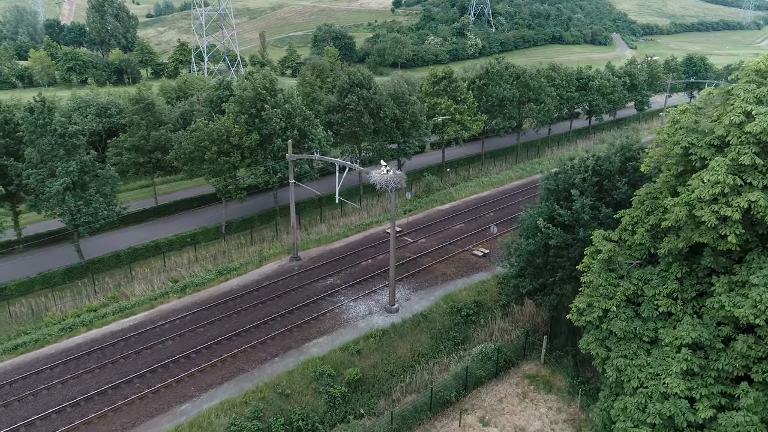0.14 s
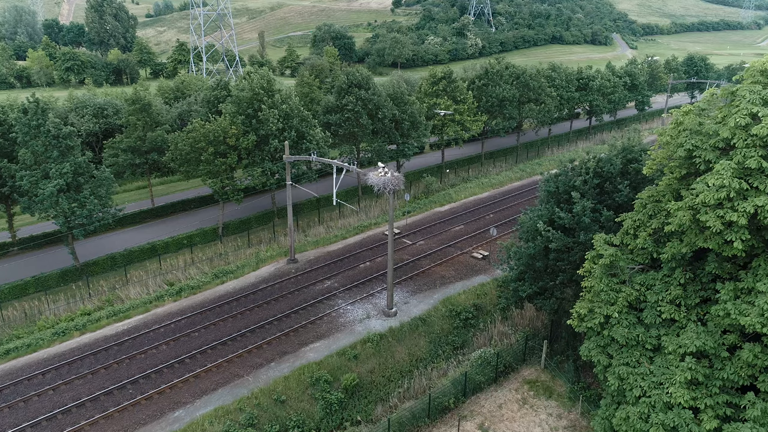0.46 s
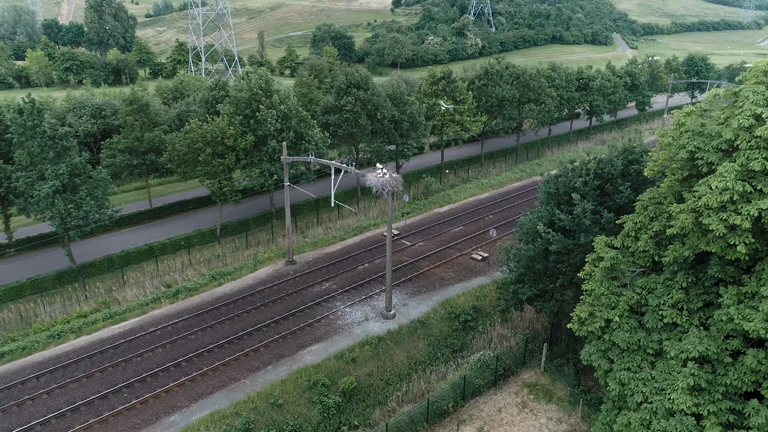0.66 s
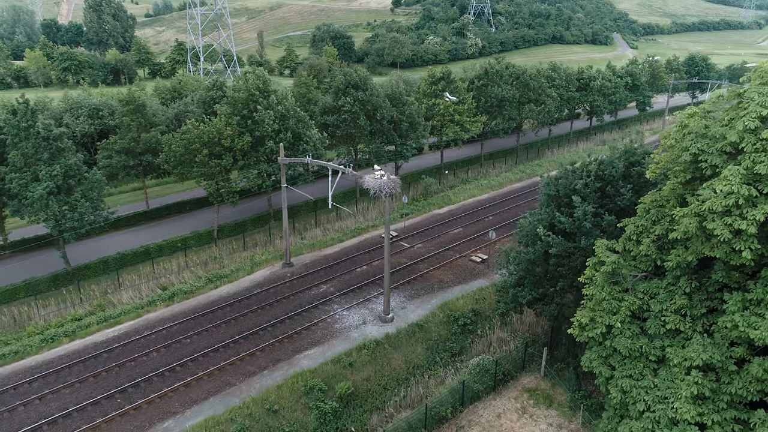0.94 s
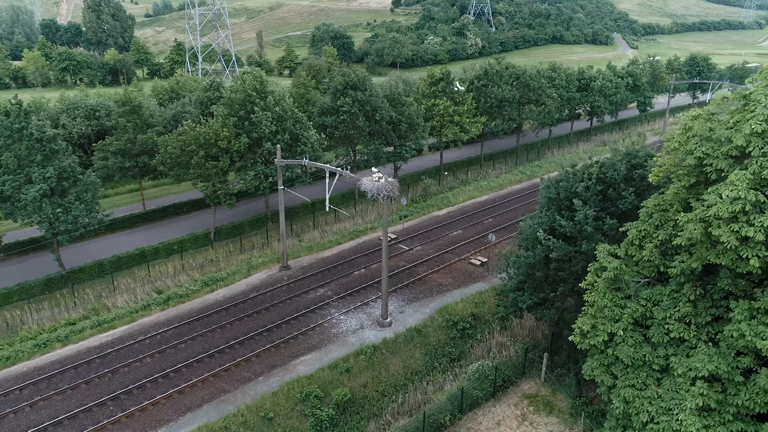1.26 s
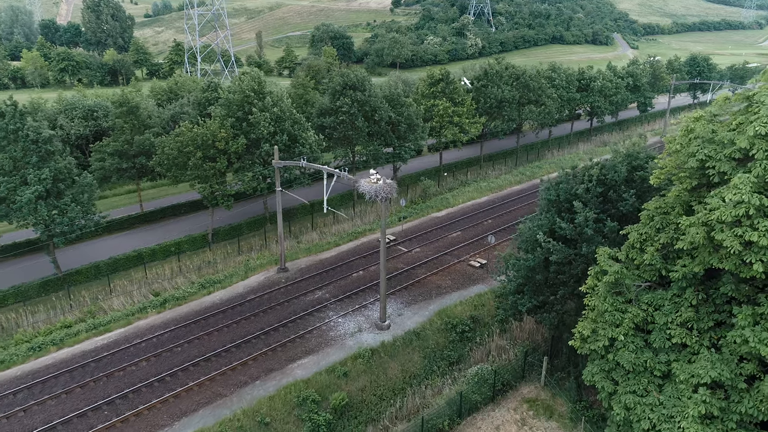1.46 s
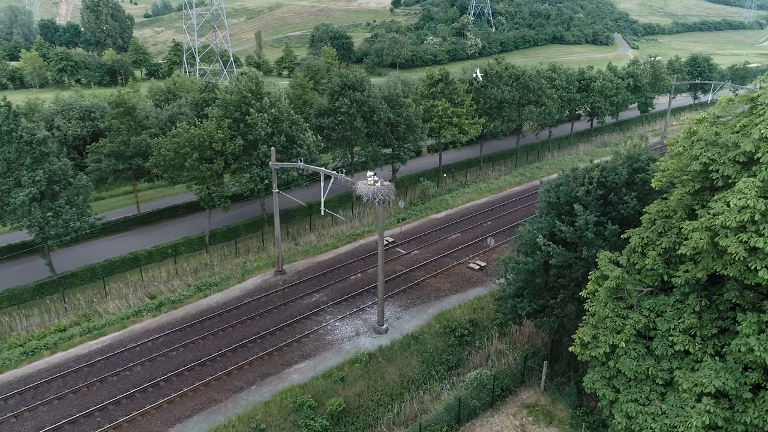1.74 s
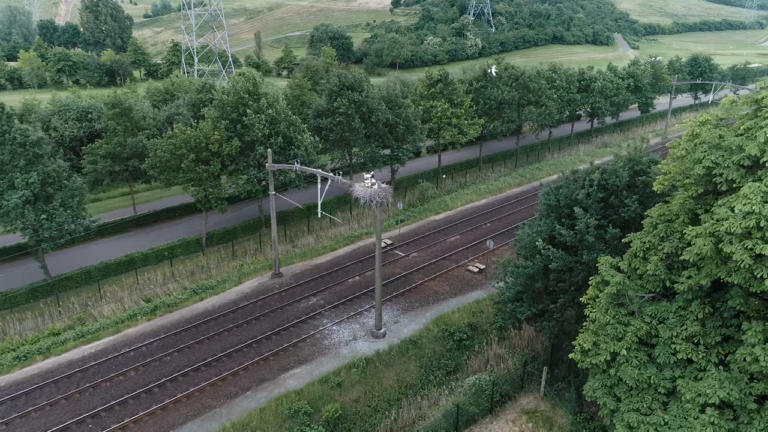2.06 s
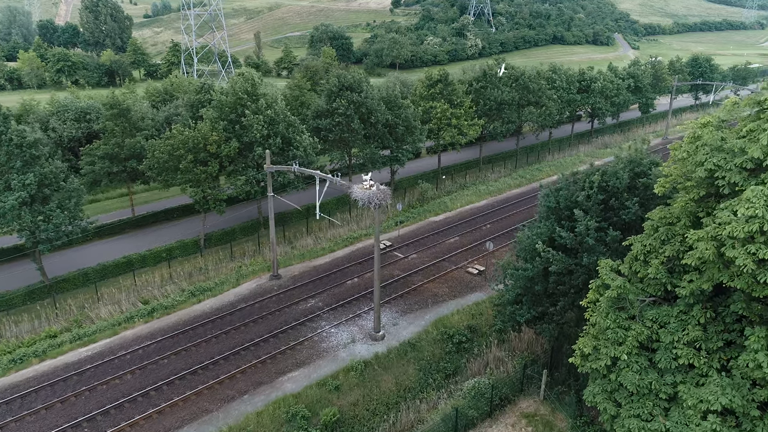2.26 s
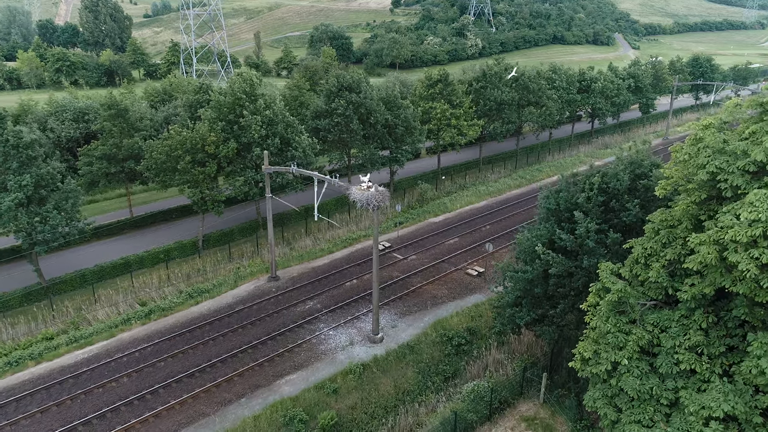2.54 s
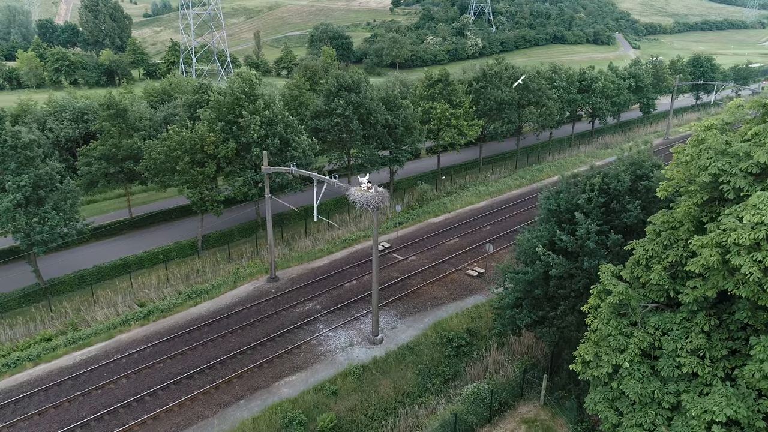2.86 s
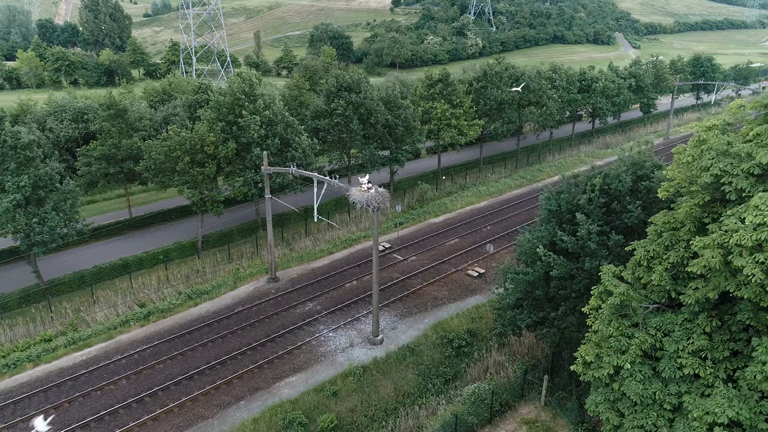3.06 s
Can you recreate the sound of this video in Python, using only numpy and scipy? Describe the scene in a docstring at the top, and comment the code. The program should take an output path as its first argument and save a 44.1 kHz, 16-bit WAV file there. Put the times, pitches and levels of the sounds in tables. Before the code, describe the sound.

Fast, hollow bill clattering from a stork slows and softens, with wind rumbling underneath.

```python
"""Beside a railway, near a stork's nest on a gantry, with trees farther off.
The bird clatters its bill, ten claps a second, slowing as it lowers its head. Each clap rings the hollow
bill and throat, whose resonances shift with the posture; nest, track bed and trees scatter it.
Low wind rumble runs underneath, with faint hiss, a thin electrical whine and one tiny, distant chirp."""
import sys
import numpy as np
from scipy import signal
from scipy.fft import rfft, irfft
from scipy.io import wavfile
from scipy.ndimage import uniform_filter1d

SR = 44100
rng = np.random.default_rng(int(sys.argv[2]) if len(sys.argv) > 2 else 0)


def store_wav(level_fs):
    """Save 16-bit WAV to argv[1]."""
    pcm = np.round(np.clip(np.atleast_2d(level_fs), -1, 1) * 32767)
    wavfile.write(sys.argv[1], SR, pcm.T.astype(np.int16))


N = 141120


def undb(db):
    """Decibels to amplitude."""
    return 10 ** (np.asarray(db) / 20)


def unit(x):
    """Scale to an rms of 1."""
    return x / np.sqrt(np.mean(x ** 2))


def curve(t, rows):
    """Straight lines through (s, value) rows."""
    return np.interp(t, *np.array(rows).T[:2])


def noise(points, size):
    """Noise of rms 1 with a spectrum shaped by (Hz, dB) points."""
    hz, db = np.array(points).T
    bins_hz = np.maximum(np.fft.rfftfreq(size, 1 / SR), 1)
    shape = undb(np.interp(np.log(bins_hz), np.log(hz), db))
    return unit(irfft(rfft(rng.standard_normal(size)) * shape, size))


def walk(rate):
    """Smooth random wander of rms 1, taking `rate` steps a second."""
    hold = max(int(SR / rate), 1)
    steps = np.repeat(rng.standard_normal(N // hold + 1), hold)
    return unit(uniform_filter1d(steps, hold)[:N])


def fade(t, t60):
    """Exponential decay that loses 60 dB in t60 seconds."""
    return np.exp(-np.log(1000) * t / t60)


def add(out, x, at):
    """Mix x into out from a time in seconds."""
    start = max(int(at * SR), 0)
    out[start:start + len(x)] += x[:max(len(out) - start, 0)]


def wind(t):
    """Wind at the microphone: a deep gust dies away; a rumble with one lull and a softer rush go on."""
    # Rumble and the rush above it. Each row: frequency in Hz, relative spectral level in dB.
    rumble_colour = [(15, -14.5), (28, 3.5), (60, 1.5), (110, 0), (175, 1.5), (220, -9.5), (300, -13),
                     (420, -20.5), (700, -24), (2000, -87)]
    rush_colour = [(120, -23), (200, -1), (290, -0.5), (420, -8), (560, -13), (720, -14), (900, -18.5),
                   (1200, -31), (2000, -63.5), (4000, -72)]
    # Their strength, the rumble's in two stretches. Each row: time in seconds, level in dB.
    rumble_levels = [
        [(0.0, -28), (0.246, -42.5), (0.286, -36), (0.706, -34), (1.17, -39.5)],
        [(1.28, -35), (2.29, -39.5), (2.306, -35), (3.14, -40.5), (3.2, -36.5)],
    ]
    rush_levels = [(0.0, -37), (0.23, -53), (0.44, -42), (0.97, -42.5), (1.25, -56), (1.29, -45),
                   (1.54, -48.5), (1.91, -42.5), (1.92, -39), (2.07, -43.5), (3.2, -46)]
    gust_db, gust_fade_s = -26, 0.068
    lull_at_s, lull_width_s, lull_depth_db = 1.222, 0.027, -10
    gust = noise([(28, -3), (56, 0), (112, -15), (560, -80)], N)
    gust *= undb(gust_db) * np.exp(-(t / gust_fade_s) ** 2)
    lull_db = lull_depth_db * np.exp(-((t - lull_at_s) / lull_width_s) ** 4)
    rumble = noise(rumble_colour, N) * undb(curve(t, np.concatenate(rumble_levels)) + lull_db)
    rush = noise(rush_colour, N) * undb(curve(t, rush_levels))
    buffeting = undb(0.8 * walk(rate=18))
    return gust + (rumble + rush) * buffeting


def hiss():
    """The faint, steady hiss of the open air."""
    # Each row: frequency in Hz, relative spectral level in dB.
    colour = [(500, 9.5), (1200, 13.5), (1650, 19), (2100, 11), (3000, 9.5), (4200, 2), (5200, 0.5),
              (6500, -3.5), (9200, -3), (10600, -10.5), (11800, -5.5), (13000, -13), (15000, -13)]
    return undb(-63) * noise(colour, N)


def whine(t):
    """Two thin electrical tones, one pulsing and one wavering in level."""
    pulsed_hz, pulses_per_s, wavering_hz = 11288, 25, 14050
    gate = np.maximum(np.cos(2 * np.pi * pulses_per_s * (t - 0.018)), 0)
    pulsed = undb(-75.5) * gate * np.sin(2 * np.pi * pulsed_hz * t)
    wavering = undb(-90.5) * (1 + 1.6 * walk(rate=140)) * np.sin(2 * np.pi * wavering_hz * t)
    return pulsed + wavering


def clap(posture, bright_db):
    """The mandibles meet: their edges crack, and bill and throat give a short, hollow knock."""
    # Resonances of bill and throat. Each row: frequency in Hz with the head thrown back, then lowered,
    # level in dB, build-up in seconds, t60 in seconds thrown back, then lowered.
    modes = [(782, 748, -1.5, 0.001713, 0.0099, 0.033), (889, 740, -1.5, 0.00198, 0.016, 0.014),
             (1580, 1870, -13.5, 0.00053, 0.0045, 0.012), (1618, 2140, -4, 0.00142, 0.015, 0.013),
             (2300, 2510, -18, 0.001532, 0.017, 0.019), (2510, 4200, -17.5, 0.001594, 0.018, 0.0062),
             (2788, 3180, -10.5, 0.001505, 0.014, 0.0072), (3507, 4200, -24, 0.000987, 0.011, 0.0065),
             (4350, 4800, -32.5, 0.00076, 0.013, 0.0057), (5100, 5200, -31, 0.00077, 0.012, 0.0027)]
    pitch_spread, level_spread_db = 0.012, 1.04
    crack_top_hz, crack_decay_s = 8600, 0.0015
    t = np.arange(SR // 20) / SR
    knock = np.zeros(len(t))
    for k, (back_hz, low_hz, db, build_s, back_t60, low_t60) in enumerate(modes):
        detune, vary = rng.standard_normal(2)
        hz = (back_hz + posture * (low_hz - back_hz)) * (1 + pitch_spread * detune)
        t60 = back_t60 * (low_t60 / back_t60) ** posture
        gain = undb(db + level_spread_db * vary + (bright_db if k >= 2 else 0))
        envelope = (1 - np.exp(-(t / build_s) ** 2)) * fade(t, t60)
        knock += gain * envelope * np.sin(2 * np.pi * hz * (t - build_s))
    lowpass = signal.butter(2, crack_top_hz, fs=SR, output="sos")
    crack = signal.sosfilt(lowpass, rng.standard_normal(len(t))) * np.exp(-t / crack_decay_s)
    crack_db = -25.5 + bright_db - 10 * posture  # softer with the head lowered
    return knock + undb(crack_db) * crack


def scatter(x, colour, t60, onset_s, size):
    """Diffuse reflections: x through a tail of unit energy that swells and decays."""
    t = np.arange(size) / SR
    swell = 1 - np.exp(-(t / onset_s) ** 2)
    tail = noise(colour, size) * fade(t, t60) * swell
    return signal.fftconvolve(x, tail / np.sqrt(np.sum(tail ** 2)))


def stork():
    """Each clap reaches the microphone directly, as near echoes, and off nest, track bed and trees."""
    # Bill claps. Each row: start in seconds, relative level in dB,
    # brightness in dB (added to the crack and all but the two lowest resonances).
    claps = [(0.019, 2.5, -3), (0.1137, 3, -4.5), (.2110, 2, -3), (0.3067, 3, -3.5), (0.4028, 3.5, -3.5),
             (0.5023, 2, -0.5), (0.5988, 2, -0.5), (.6961, 2, -1.5), (0.7943, 1, 0), (0.8925, 1.5, -1.5),
             (0.991, 4, -3.5), (1.0895, 3.5, -3), (1.1915, 3, -2), (1.2909, 2.5, -2.5), (1.3908, -0.5, 0),
             (1.4945, 2.5, -2.5), (1.603, 2, -3), (1.713, 1.5, -2.5), (1.8249, 0.5, -2), (1.9418, -2.5, -1),
             (2.0598, -2.5, -12), (2.1918, -6, 0), (2.3255, -3, -1.5), (2.4591, -4.5, -5.5),
             (2.5949, -5.5, -6), (2.7296, -4.5, -8), (2.8641, -6, -6.5), (3.0012, -5.5, -8.5),
             (3.1433, -5, -7)]
    # The neck. Each row: time in seconds, posture (0 thrown back, 1 lowered, above 1 lower still).
    postures = [(0, 0), (.4, 0.064), (.6, 0.13), (1.5, .12), (1.83, 0.31), (1.95, 0.4), (2.2, 1.04),
                (2.6, 1.22), (3.2, 1.36)]
    # Echoes from the nest and the gantry. Each row: delay in seconds, level in dB.
    echoes = [(.0085, -10.5), (.0165, -20.5)]
    # What nest, track bed and trees scatter. Each row: frequency in Hz, relative level in dB.
    nest_colour = [(400, -27), (850, -12), (1300, 16), (1700, 0), (2100, 7), (2800, 6), (3400, 23),
                   (4200, 11), (8000, -13)]
    track_colour = [(400, -10), (1700, -25), (2200, 1), (2800, -11), (3300, 23), (3800, 6), (4500, -12),
                    (8000, -19)]
    tree_colour = [(400, 5), (850, 10.5), (1300, -42), (1650, 8.5), (2100, 7), (3200, 14), (4500, -7),
                   (8000, 8)]
    bright_share = 0.61  # share of a clap's change in brightness that the far surroundings receive
    out = np.zeros(N)
    for at, db, bright_db in claps:
        gain, posture = undb(db - 26), curve(at, postures)
        direct = gain * clap(posture, bright_db)
        around = gain * clap(posture, bright_share * bright_db)
        add(out, direct, at)
        for delay, echo_db in echoes:
            add(out, undb(echo_db) * direct, at + delay * (1 + 0.03 * rng.standard_normal()))
        nest = scatter(direct, nest_colour, t60=0.12, onset_s=0.005, size=SR // 4)
        track = scatter(around, track_colour, t60=0.13, onset_s=0.01, size=SR // 4)
        trees = scatter(around, tree_colour, t60=1, onset_s=0.01, size=SR)
        add(out, undb(-9.5) * nest, at)
        add(out, undb(-13.5) * track, at + 0.011)  # the track bed answers 11 ms later
        add(out, undb(-13.5) * trees, at)
    return out


def chirp(t):
    """One faint, high chirp far away: a blip of narrow-band noise."""
    at_s, width_s, hz = 2.527, 0.010, 5150
    band = noise([(hz, -50), (hz, 0), (hz * 1.4, -50)], N)
    return undb(-72) * band * np.exp(-((t - at_s) / width_s) ** 2)


def scene():
    """The stork over its background, at one microphone."""
    t = np.arange(N) / SR
    return (stork() + wind(t) + hiss() + chirp(t) + whine(t))[None]


def record(dry):
    """The recorder cuts the top steeply above 15 kHz."""
    return signal.sosfilt(signal.ellip(10, 0.1, 70, 15000, fs=SR, output="sos"), dry)


dry = scene()
out = record(dry)
store_wav(out)
```